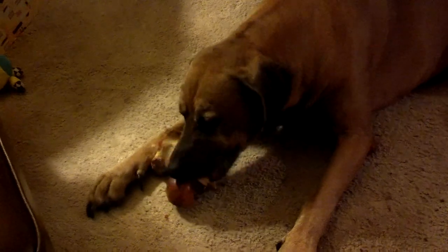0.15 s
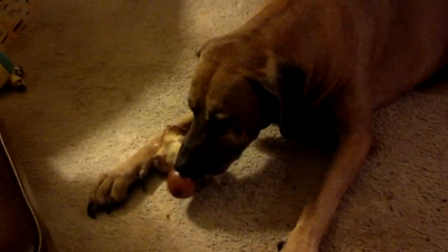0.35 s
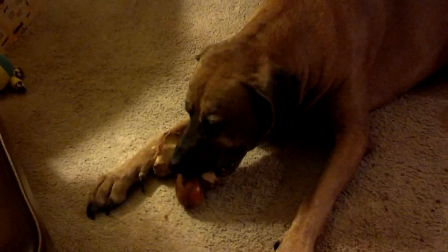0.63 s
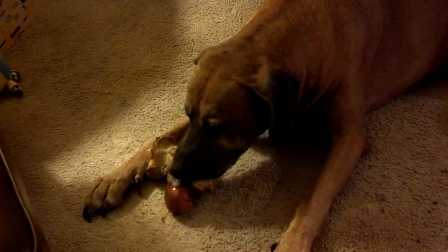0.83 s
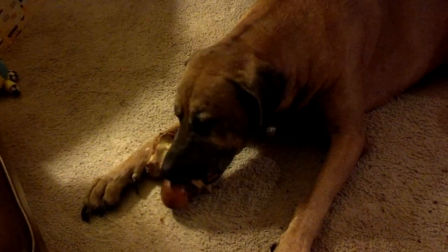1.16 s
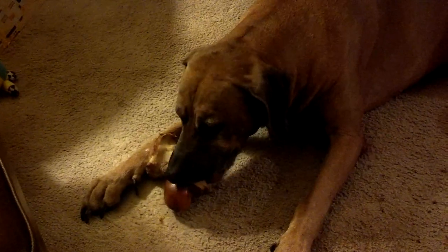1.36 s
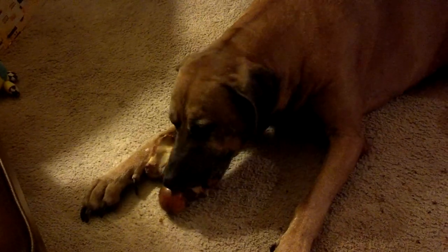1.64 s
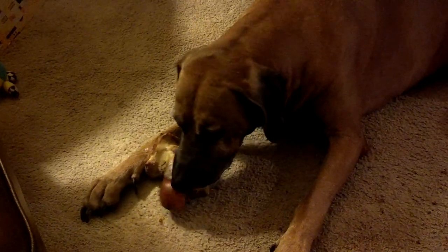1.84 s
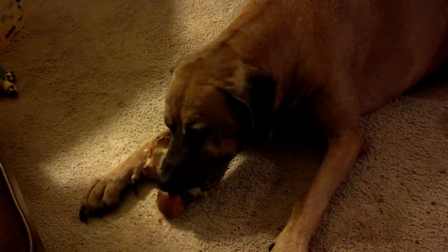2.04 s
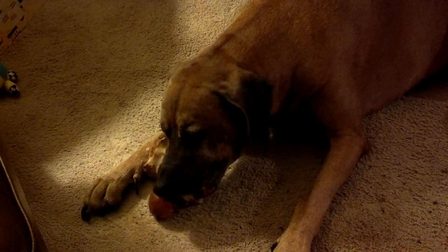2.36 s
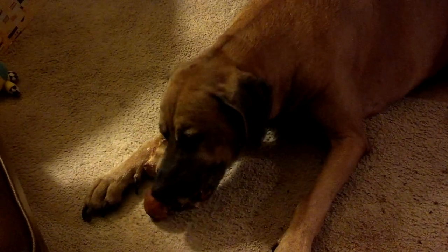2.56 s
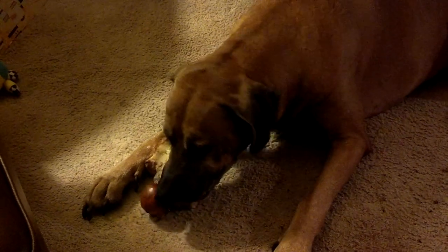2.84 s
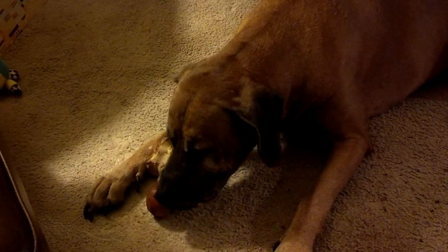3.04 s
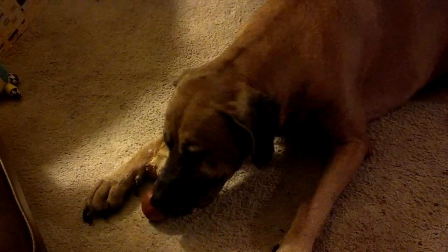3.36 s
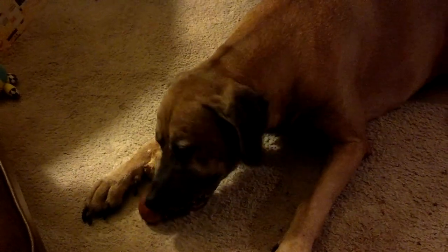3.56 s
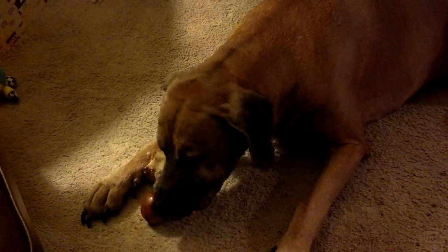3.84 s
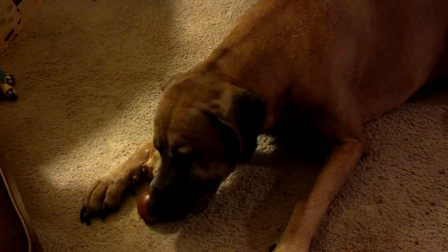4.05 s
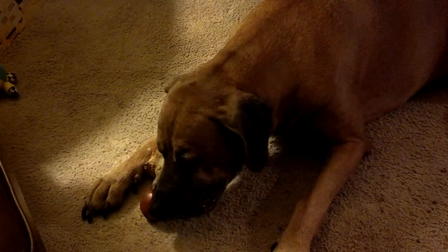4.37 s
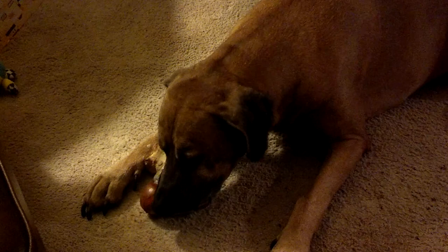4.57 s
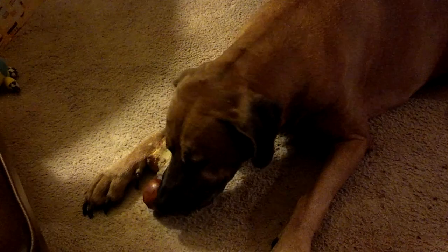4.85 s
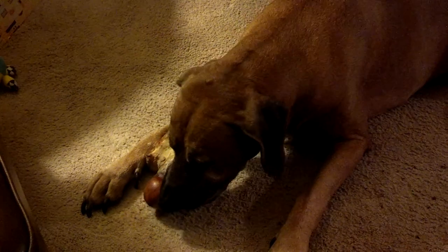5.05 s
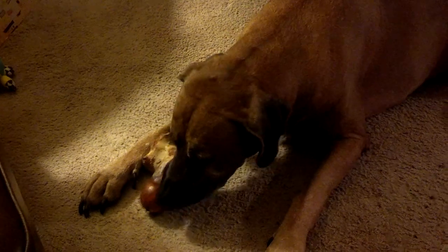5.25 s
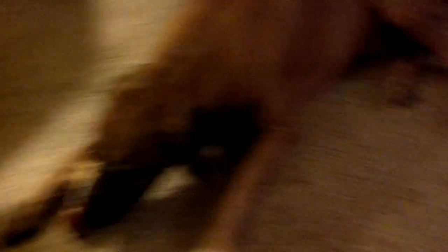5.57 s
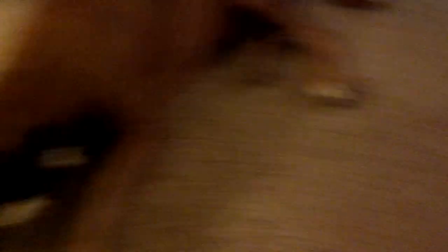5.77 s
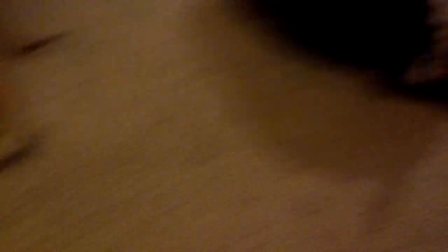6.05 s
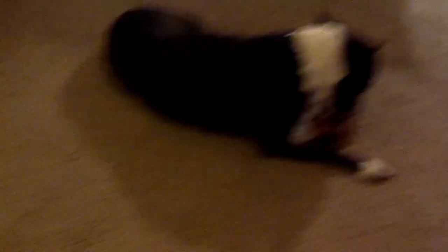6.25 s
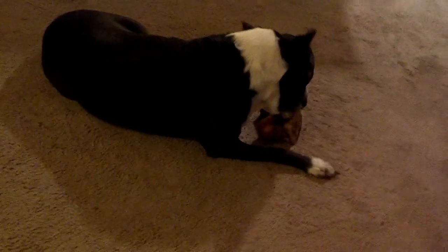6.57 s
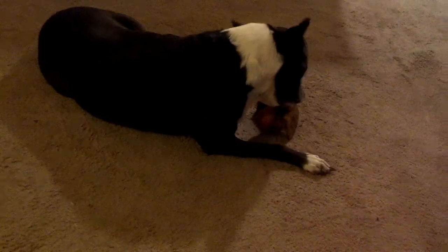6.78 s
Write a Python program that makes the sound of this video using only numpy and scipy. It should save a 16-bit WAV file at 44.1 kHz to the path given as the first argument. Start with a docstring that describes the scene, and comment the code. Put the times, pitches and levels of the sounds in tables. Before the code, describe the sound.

A dog gnaws a large bone close by on carpet, with hollow knocks, sharp cracks and gritty grinding in irregular clusters over soft hiss.

```python
"""Hollow knocks, sharp cracks and gritty grinding: a dog on a carpet gnaws a large bone close to a camera.
Each tooth that slips rings the bone's modes, pitched by the grip; cracks are noise bursts with pings.
Between slips the teeth grind: sparse grit excites resonances, under ticking noise; one wet lip smack glides down.
A carpeted room echoes; broad noise swells and sinks over a faint low hum; late on, the hand-held camera turns
aside. Left and right differ in phase by frequency, in steps; the left of its two ports resonates."""
import sys
import numpy as np
from scipy import signal
from scipy.fft import rfft, irfft, next_fast_len
from scipy.io import wavfile
from scipy.ndimage import map_coordinates

SR = 44100
rng = np.random.default_rng(int(sys.argv[2]) if len(sys.argv) > 2 else 0)


def store_wav(level_fs):
    """Save 16-bit WAV to argv[1]."""
    pcm = np.round(np.clip(np.atleast_2d(level_fs), -1, 1) * 32767)
    wavfile.write(sys.argv[1], SR, pcm.T.astype(np.int16))


def volts_from_decibels(level):
    """Turn decibel levels (scalar or array-like) into linear amplitude factors."""
    exponent = np.asarray(level, float) / 20
    return 10 ** exponent


N = 305172

# Level of the room noise. Each row: time [s], level [dB].
ROOM_LEVEL = [(0, -45), (.35, -42.5), (1, -37), (1.6, -32), (1.64, -43.5), (2.3, -39.5), (2.9, -43.5),
              (3.45, -40), (4.3, -46), (5.1, -38.5), (5.6, -41.5), (6.92, -37.5)]
# Colour of the rumble. Each row: frequency [Hz], density [dB per Hz].
RUMBLE_COLOUR = [(50, -43), (100, -4), (205, 0), (600, 0), (1100, -9), (2500, -36)]
# Colour of the hiss. Each row: frequency [Hz], density [dB per Hz].
HISS_COLOUR = [(1000, 12), (2000, 12.5), (5500, -1), (8000, -3), (10500, -11), (14000, -32), (16000, -18)]
# Hum partials. Each row: frequency [Hz], mean level over the room level [dB].
HUM_PARTIALS = [(80.4, -18.5), (160.8, -10), (209, -8)]
# Decay of the carpeted room. Each row: frequency [Hz], t60 [s].
ROOM_DECAY = [(500, 0.24), (12000, 0.12)]
# Strength of the echo. Each row: frequency [Hz], level [dB].
ECHO_COLOUR = [(600, -12), (6000, -5.5)]

# Lip smack. One row: time [s], level [dB], start pitch [Hz], end pitch [Hz], glide time constant [s].
LIP_SMACK = (.489, -21, 3000, 1300, .007)

# Bites. Each row: start [s], length [s], knock level [dB], crunch level [dB].
BITES = [(0.099, 0.2, -31, -42.5), (0.376, 0.11, -60, -47), (0.493, 0.061, -55, -47),
         (0.662, 0.15, -31.5, -51), (1.081, 0.24, -33, -44.5), (1.574, 0.13, -29, -36.5),
         (1.72, 0.065, -29.5, -47.5), (1.886, 0.061, -47, -45.5), (2.07, 0.065, -47, -39),
         (2.359, 0.11, -29.5, -37.5), (2.642, 0.11, -31.5, -36.5), (2.749, 0.13, -28.5, -48.5),
         (3.183, 0.084, -36, -42.5), (3.512, 0.13, -24.5, -36.5), (3.632, 0.084, -35, -48),
         (4.026, 0.13, -33, -36.5), (4.456, 0.1, -34, -46.5), (4.779, 0.21, -34.5, -43),
         (5.178, 0.17, -38.5, -45), (5.36, 0.077, -35, -45), (5.811, 0.13, -30, -51.5),
         (6.3, 0.11, -35, -43.5)]
# Bites with the bone deep in the mouth. Each entry: start [s].
MUFFLED_BITES_S = [4.458, 5.81, 6.307]
# Resonances of the marrow hollow. Each row: centre [Hz], width [Hz], level [dB].
HOLLOW_MODES = [(615, 60.4, 0.5), (728, 108, -5.5)]
# Resonances of the bone's walls. Each row: centre [Hz], width [Hz], level [dB].
WALL_MODES = [(444, 240, 11), (1286, 197, 10), (1770, 420, 3), (3480, 115, 0.5)]
# Further cracks, some together with a slip or bite. Each row: time [s], level [dB].
FURTHER_CRACKS = [(0.113, -20), (0.186, -19.5), (0.7608, -23.5), (1.1323, -25.5), (1.2559, -22.5),
                  (1.6133, -12.5), (1.6194, -20), (1.9074, -24),  (2.112, -18.5), (2.3955, -23),
                  (2.4257, -16.5), (2.6565, -20.5), (2.6786, -22), (3.1595, -25), (3.1883, -17.5),
                  (3.5368, -22.5), (3.5576, -20), (3.916, -34.5), (3.9866, -33.5), (3.9928, -30.5),
                  (4.0108, -30), (4.038, -28), (4.0446, -18.5), (4.1002, -16), (4.1598, -26.5),
                  (4.3991, -38), (5.1793, -23), (5.229, -23), (5.3664, -20), (6.224, -29.5), (6.2455, -29),
                  (6.2601, -29.5), (6.312, -22), (6.3704, -21.5), (6.388, -28.5)]
# Colour of cracks and crunch. Each row: frequency [Hz], level [dB].
CRACK_COLOUR = [(300, 1), (2500, -4), (8200, 1), (12000, -3.5), (15500, 0.5)]

# Tooth slips. Each row: time [s], peak of the knock [dB].
SLIPS = [(0.078, -20), (0.099, -16), (0.127, -13.5), (0.188, -14), (0.234, -10.5), (0.273, -19),
         (0.651, -20), (0.698, -17.5), (0.709, -10.5), (1.129, -17), (1.204, -12.5), (1.575, -19.5),
         (1.592, -18), (1.618, -17.5), (1.702, -20), (1.731, -19), (1.741, -12.5), (1.751, -22),
         (1.774, -9), (1.91, -23), (2.02, -20), (2.07, -16.5), (2.108, -14.5), (2.143, -14), (2.158, -14),
         (2.439, -8.5), (2.475, -15.5), (2.677, -13), (2.701, -14.5), (2.727, -11.5), (2.766, -8.5),
         (2.798, -21), (2.808, -18), (2.821, -12), (3.193, -10), (3.203, -8.5), (3.513, -14), (3.536, -26),
         (3.559, -11.5), (3.573, -29), (3.585, -15), (3.611, -9), (3.655, -16.5), (3.678, -13.5),
         (3.728, -15.5), (4.031, -12), (4.084, -15), (4.119, -19), (4.161, -6.5), (4.457, -20.5),
         (4.518, -17), (4.808, -14.5), (4.822, -18), (4.852, -17), (4.887, -18.5), (4.92, -13),
         (4.927, -13.5), (5.082, -19.5), (5.178, -20), (5.279, -17), (5.36, -17), (5.369, -9),
         (5.412, -10.5), (5.883, -13), (6.314, -19), (6.372, -18.5)]
# Slips where the tooth drags. Each entry: time [s].
DRAGGED_SLIPS_S = [.234, 2.07, 2.439, 3.611, 4.808, 4.852, 4.887]
# Modes of the bone. Each row: multiple of the hollow's pitch [ratio], mean level [dB], nominal t60 [s].
BONE_MODES = [(0.7, -20, 0.068), (0.977, -11.5, 0.3), (1, 13.5, 0.052), (1.25, -23.5, 0.032),
              (1.95, -9, 0.034), (2.75, -10, 0.023)]
# Gain of the bone's top treble. Each row: time [s], gain [dB].
TREBLE_GAIN = [(0, -15), (2.3, -4), (3.6, 0.5), (4.1, -3.5), (6.3, -7)]

# The camera turns. Each row: time [s], bone in the left port over the right [dB].
CAMERA_TURN = [(5.4, .5), (5.8, 6), (6.9, 5)]
# Phase difference between left and right, in steps. Each row: frequency [Hz], difference [half turns].
STEREO_PHASE = [(1700, 0), (2200, 1), (2700, 1), (3150, 2), (4000, 2), (4750, 3), (5150, 3), (6500, 2),
                (8800, .2), (13000, 3), (15700, 1)]
# Likeness of the ports in diffuse sound. Each row: frequency [Hz], correlation [-1 to 1].
PORT_LIKENESS = [(60, -.45), (250, .4), (700, .7), (2250, .95), (2550, .99), (3150, .7), (4900, .92),
                 (5600, .5)]
# Resonance of the left port. One row: centre [Hz], width [Hz], gain [dB].
LEFT_PORT_MODE = (8000, 920, 7.67)

CLOSE_S, OPEN_S = 0.0017, 0.023  # the jaw takes hold and lets go
FIRM_CRUNCH_DB = -40  # a firm bite: scrape and bite cracks are set for it
SCRAPE_DB, SCRAPE_DB_PER_CRUNCH_DB = -44, 0.5
KNOCK_BUILDS_S = 0.026  # the hollow joins in as the teeth sink
FIRST_CRACK_DB, SLIP_CRACK_DB, CRACK_DB_PER_CRUNCH_DB = -26.5, -26.5, 0.65
BURST_MIN_RISE_S = 0.0007
LOOSE_HZ, GRIP_HZ = 652, 661.3  # the hollow between bites and at a firm bite's start
GRIP_HZ_PER_CRUNCH_DB, SAG_HZ_PER_S = 4, 253  # it sinks as the teeth dig in
PITCH_SCATTER_HZ, MODE_SCATTER_DB = 18, 5
CONTACT_S, DRAG_RATIO = 0.0014, 3.5  # typical onset of a slip; longer where the tooth drags
MUFFLED_RING_RATIO, MUFFLED_THUD_DB = 0.59, 16.5  # shorter ring, stronger lowest mode
TREBLE_HZ, TOP_HZ = 11100, 15900


def unit(x):
    """Scaled to rms 1."""
    return x / np.sqrt(np.mean(x ** 2) + 1e-20)


def along(points, hz):
    """(Hz, value) points read on a log axis."""
    f, v = np.transpose(points)
    return np.interp(np.log(hz + 1), np.log(f + 1), v)


def curves(rows):
    """One value per sample for each column after the time."""
    s, *cols = np.transpose(rows)
    return [np.interp(np.arange(N) / SR, s, c) for c in cols]


def wobble(rate_hz):
    """A smooth random curve with rate_hz knots a second."""
    knots = rng.standard_normal(int(N * rate_hz / SR) + 4)
    return map_coordinates(knots, [np.arange(N) * rate_hz / SR])


def filtered(x, response):
    """x times a complex response of frequency."""
    m = next_fast_len(N + 8192)
    return irfft(rfft(x, m) * response(np.fft.rfftfreq(m, 1 / SR)), m)[..., :N]


def resonant(x, modes):
    """x through parallel resonances of alternating sign."""
    def response(f):
        total = 0
        for k, (centre, width, db) in enumerate(modes):
            band = 1j * f * width
            total = total + (-1) ** k * volts_from_decibels(db) * band / (centre * centre - f * f + band)
        return total
    return filtered(x, response)


def diffuse(pair, spectrum):
    """Two unrelated signals become the two ports, partly shared by frequency."""
    def mid_side(hz):
        angle = np.arccos(np.clip(along(PORT_LIKENESS, hz), -1, 1)) / 2
        return volts_from_decibels(along(spectrum, hz)) * [np.cos(angle), np.sin(angle)]
    mid, side = filtered(pair, mid_side)
    return np.array([mid + side, mid - side])


def grit(rate_hz, spread_db):
    """Sparse tiny slips of very unequal size, in clumps."""
    size = volts_from_decibels(spread_db * rng.exponential(size=N).clip(0, 2) + 2.5 * wobble(45))
    return (rng.random(N) < rate_hz / SR) * rng.standard_normal(N) * size


def flakes(rate_hz):
    """Stereo noise in brief ticks over a weak steady rub."""
    decay = volts_from_decibels(-120 * np.arange(SR // 30) / SR / 0.009)  # of power: t60 9 ms
    power = signal.fftconvolve(grit(rate_hz, spread_db=1.3) ** 2, decay)[:N]
    ticks = np.sqrt(power.clip(0))
    return (unit(ticks) + 0.55) * rng.standard_normal((2, N))


def bite_at(s):
    """Time into the bite [s], its crunch over a firm one [dB], and whether the jaw is closed, at times s."""
    bites = np.array(BITES)
    index = (np.searchsorted(bites[:, 0], s + OPEN_S) - 1).clip(0)
    start, length, _, crunch_db = bites[index].T
    into = s - start
    closed = (into > -OPEN_S) & (into < length + OPEN_S)
    return into, crunch_db - FIRM_CRUNCH_DB, closed


def room_noise():
    """Uneven rumble and hiss with faint stray ticks swell and sink together with a faint unsteady hum."""
    level_db, = curves(ROOM_LEVEL)
    t = np.arange(N) / SR
    hum = sum(volts_from_decibels(db + 2 * wobble(8)) * np.sin(2 * np.pi * hz * t + wobble(8)) for hz, db in HUM_PARTIALS)
    rumble = unit(diffuse(rng.standard_normal((2, N)), RUMBLE_COLOUR))
    rumble = volts_from_decibels(1.5 + 1.34 * wobble(9)) * rumble
    hiss = unit(diffuse(rng.standard_normal((2, N)) + 0.12 * flakes(25), HISS_COLOUR))
    hiss = volts_from_decibels(-5.5 + 1.5 * wobble(14)) * hiss
    return volts_from_decibels(level_db) * (rumble + hiss + hum)


def echo(x):
    """Each frequency of the echo dies at its own speed; its noise tail is redrawn every fifth of a second."""
    wet, step = np.zeros((2, N + 2 * SR)), SR // 5
    for start in range(0, N, step):
        hz, t, z = signal.stft(rng.standard_normal((2, SR // 3)), SR, nperseg=256)
        decay = volts_from_decibels(-60 * t / along(ROOM_DECAY, hz)[:, None])
        tail = signal.istft(z * decay, SR, nperseg=256)[1]
        tail = tail / np.linalg.norm(tail[0])
        part = signal.fftconvolve(x[None, start:start + step], tail, axes=1)
        wet[:, start + 250:][:, :part.shape[1]] += part  # 250 samples late
    return diffuse(wet[:, :N], ECHO_COLOUR)


def smack():
    """A wet lip lets go: a small cavity whose pitch drops fast."""
    s, db, from_hz, to_hz, glide_s = LIP_SMACK
    t = np.clip(np.arange(N) / SR - s, 0, None)
    pitch_hz = to_hz + (from_hz - to_hz) * np.exp(-t / glide_s)
    envelope = volts_from_decibels(db - 60 * t / 0.08) * (1 - np.exp(-t / 0.002))
    return envelope * np.sin(2 * np.pi * np.cumsum(pitch_hz) / SR + wobble(400))


def grinding():
    """During a bite small slips excite the hollow and the walls; flakes come off as brief ticks."""
    t = np.arange(N) / SR
    pressure = []
    for s, length, *_ in BITES:
        closing, opening = (t - s) / CLOSE_S, (s + length - t) / OPEN_S + 0.33
        pressure.append(np.clip(np.minimum(closing, opening), 0, 1))
    knock_db, crunch_db = np.array(BITES)[:, 2:].T
    scrape_db = SCRAPE_DB + SCRAPE_DB_PER_CRUNCH_DB * (crunch_db - FIRM_CRUNCH_DB)
    knock_gain, scrape_gain, crunch_gain = volts_from_decibels([knock_db, scrape_db, crunch_db]) @ np.array(pressure)
    knock_gain = knock_gain * np.clip(bite_at(t)[0] / KNOCK_BUILDS_S, 0.15, 1)
    slip = grit(2000, spread_db=2)
    knock = resonant(knock_gain * slip, HOLLOW_MODES) / np.std(resonant(slip, HOLLOW_MODES))
    scrape = resonant(scrape_gain * slip, WALL_MODES) / np.std(resonant(slip, WALL_MODES))
    crunch = unit(diffuse(flakes(170), CRACK_COLOUR))  # scattered by muzzle and paws
    return knock + scrape + crunch_gain * crunch


def all_cracks():
    """(s, dB) of cracks at each bite's first contact and its slips, louder in harder bites, and further ones."""
    start, slip = np.array(BITES)[:, 0], np.array(SLIPS)[:, 0]
    into, harder_db, closed = bite_at(slip)
    first_db = FIRST_CRACK_DB + CRACK_DB_PER_CRUNCH_DB * bite_at(start)[1]
    slip_db = SLIP_CRACK_DB + CRACK_DB_PER_CRUNCH_DB * harder_db
    inside = closed & (into > 0)
    return [*zip(start, first_db), *zip(slip[inside], slip_db[inside]), *FURTHER_CRACKS]


def cracks():
    """Splinters break off: a burst of a few ms, brief pings, a crumble, and a ring of the bone's walls."""
    snap, body = np.zeros((2, N + SR)), np.zeros(N + SR)
    t, rows = np.arange(SR // 20) / SR, all_cracks()
    noise, luck = rng.standard_normal((len(rows), 3, len(t))), rng.random((len(rows), 4, 1))
    for (s, db), fizz, (slow, *pitch) in zip(rows, noise, luck):
        at = round(s * SR)
        ping_hz = 2800 * 4 ** np.array(pitch)
        pings = volts_from_decibels(db - 10 - 60 * t / 0.014) * np.sin(2 * np.pi * ping_hz * t).sum(axis=0)
        u = t / (BURST_MIN_RISE_S * 2 ** slow)
        burst = volts_from_decibels(db - 6) * u * np.exp(-u)
        crumble = volts_from_decibels(db - 18.5 - 60 * t / 0.076)
        snap[:, at:][:, :len(t)] += (burst + crumble) * fizz[:2] + pings
        body[at:][:len(t)] += volts_from_decibels(db + 1.0 - 60 * t / 0.023) * fizz[2]
    return diffuse(snap[:, :N], CRACK_COLOUR) + resonant(body[:N], WALL_MODES)


def slips():
    """Every slip rings the bone's modes at new strengths; flesh softens the start, more for some than others."""
    knock, t = np.zeros(N + SR), np.arange(SR // 8) / SR
    slip_s = np.array(SLIPS)[:, 0]
    into, harder_db, closed = bite_at(slip_s)
    grip_hz = GRIP_HZ + GRIP_HZ_PER_CRUNCH_DB * harder_db - SAG_HZ_PER_S * into
    pitch_hz = np.where(closed, grip_hz, LOOSE_HZ)
    muffled = np.isclose((slip_s - into)[:, None], MUFFLED_BITES_S, atol=OPEN_S).any(axis=1)
    dragged = np.isclose(slip_s[:, None], DRAGGED_SLIPS_S, atol=0.004).any(axis=1)
    contact_s = CONTACT_S * DRAG_RATIO ** dragged
    draws = rng.standard_normal((len(SLIPS), len(BONE_MODES) + 3))
    for (s, db), hz, deep, rise_s, (soft, off, grip, *luck) in zip(SLIPS, pitch_hz, muffled, contact_s, draws):
        hz = hz + PITCH_SCATTER_HZ * off
        lasts = MUFFLED_RING_RATIO ** deep * np.exp(0.2 * grip)
        ring = np.zeros(len(t))
        for i, ((k, mode_db, t60), z) in enumerate(zip(BONE_MODES, luck)):
            thud_db = MUFFLED_THUD_DB * deep * (i == 0)
            scatter_db = MODE_SCATTER_DB * z * (k != 1)  # side modes only
            level_db = mode_db + thud_db + scatter_db - 60 * t / t60 / lasts
            ring += volts_from_decibels(level_db) * np.sin(2 * np.pi * k * hz * t)
        onset_s = rise_s * lasts * np.exp(0.38 * soft)
        ring = ring * (1 - np.exp(-(t / onset_s) ** 2))
        knock[round(s * SR):][:len(t)] += volts_from_decibels(db) * ring / np.abs(ring).max()
    return knock[:N]


def scene():
    """The bone and the lip smack with varying treble, turned aside, plus echo and room noise."""
    bone = slips() + cracks() + grinding() + smack()
    (left_db,), (treble_db,) = curves(CAMERA_TURN), curves(TREBLE_GAIN)
    treble = filtered(bone, lambda hz: 1 / (1 + (TREBLE_HZ / (hz + 1)) ** 8))
    bone = bone + (volts_from_decibels(treble_db) - 1) * treble
    return bone * volts_from_decibels([left_db / 2, -left_db / 2]) + echo(bone.mean(axis=0)) + room_noise()


def top_cut(x):
    """Nothing passes above the cut-off."""
    return signal.sosfilt(signal.butter(12, 17010, fs=SR, output="sos"), x)


def record(dry):
    """Left and right part in phase, the left port resonates; little below 60 Hz, nothing from TOP_HZ up."""
    def response(hz):
        """Complex gain of left and right."""
        half_phase = np.pi / 2 * np.interp(hz, *np.transpose(STEREO_PHASE))
        centre, width, db = LEFT_PORT_MODE
        gain = volts_from_decibels([db * np.exp(-((hz - centre) / width) ** 2), 0 * hz])
        band = (hz < TOP_HZ) / (1 + (60 / (hz + 1)) ** 4)
        return gain * np.exp([1j * half_phase, -1j * half_phase]) * band
    mix = filtered(dry, response)
    return top_cut(mix)


dry = scene()
out = record(dry)
store_wav(out)
```